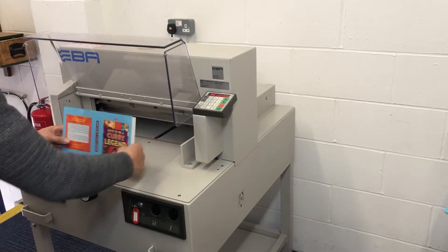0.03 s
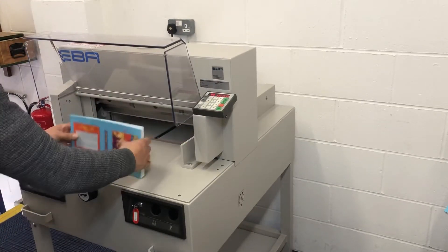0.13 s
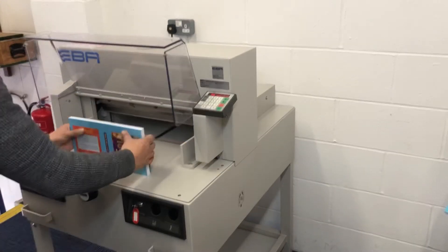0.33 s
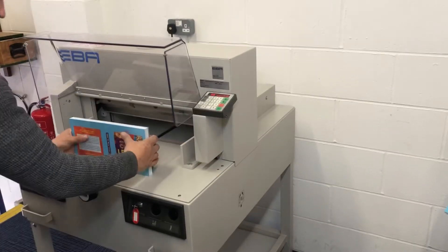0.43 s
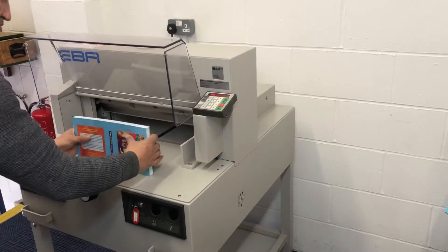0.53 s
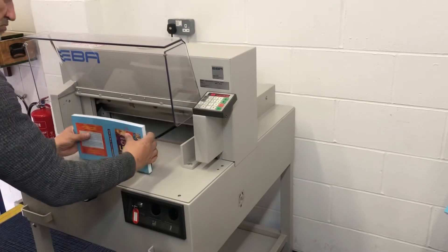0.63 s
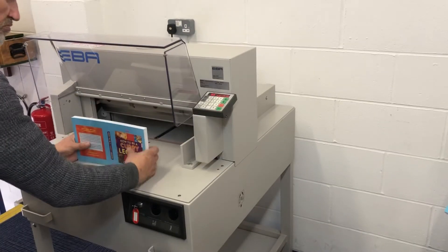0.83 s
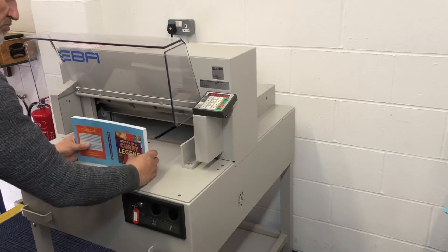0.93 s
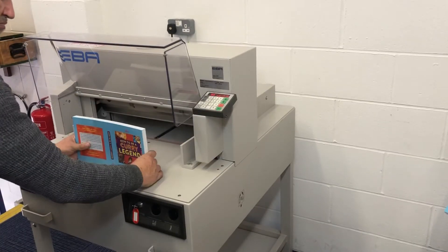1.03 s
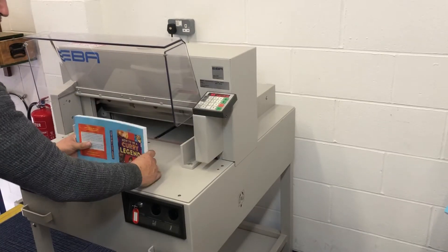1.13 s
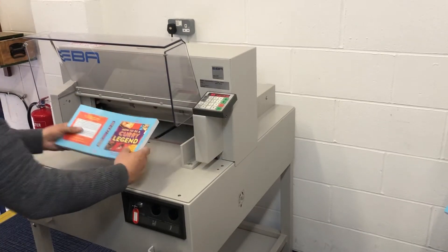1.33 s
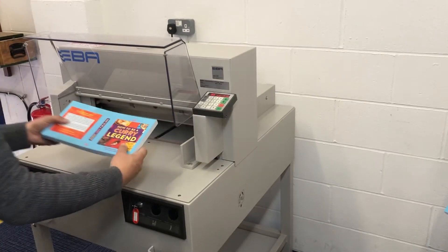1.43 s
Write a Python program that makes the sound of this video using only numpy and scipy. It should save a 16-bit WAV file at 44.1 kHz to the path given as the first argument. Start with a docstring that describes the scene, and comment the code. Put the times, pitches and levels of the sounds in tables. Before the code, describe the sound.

In a bare workroom with a faint hum, a paper stack thuds edge-down on a metal table two times. The panels resonate and the walls echo, while fingers and sheets rustle quietly before, between and after the knocks.

```python
"""A stack of paper knocked twice on the steel table of a cutting machine in a bare workroom.
Each time a corner touches first, then the whole edge slaps down; the table rings, the walls echo.
The machine's panels boom under the weight; one springs back as the stack is lifted.
Fingers and sheets rustle around the knocks, over room air and a faint hum."""
import sys
import numpy as np
from scipy import signal
from scipy.fft import rfft, irfft
from scipy.io import wavfile

SR = 44100
rng = np.random.default_rng(int(sys.argv[2]) if len(sys.argv) > 2 else 0)


def transcribe(u):
    """Save the signal u as a 16-bit wav file named by the first command-line argument.

    u: samples, shape (n,) or (channels, n), limited to [-1, 1]; the rate is SR.
    q: integer samples, one column per channel.
    """
    v = np.clip(np.atleast_2d(u).T, -1, 1)
    q = np.round(v * 32767).astype(np.int16)
    wavfile.write(sys.argv[1], SR, q)


N = 66150

# still room air (frequency [Hz], relative density [dB])
AIR_SPECTRUM = [(20, -6), (45, 1.5), (72, 9.5), (110, 3), (200, 0), (330, -5.5), (500, -7), (800, -13),
                (1500, -18.5), (3000, -24.5), (7000, -36), (15500, -39)]
# machine hum (frequency [Hz], level [dB])
HUM_TONES = [(150, -54), (226, -67), (441, -69)]
# room decay (frequency [Hz], T60 [s])
ROOM_DECAY = [(100, 0.8922), (300, 0.8009), (900, 0.901), (2200, 0.7314), (4500, 0.7096), (8000, 0.2933),
              (15000, 0.0053)]
# echo against direct sound (frequency [Hz], gain [dB])
ROOM_GAIN = [(30, -18), (70, 1.5), (200, 2), (450, -1.5), (1100, -1.5), (2600, -5.5), (5500, -11),
             (10000, -4.5), (15000, -6.5)]
# bright swish of paper (frequency [Hz], relative density [dB])
SWISH_SPECTRUM = [(500, -17.5), (2000, -14), (5000, 0), (7500, -3), (10000, -1.5), (15500, -0.5)]
# lower scuff of paper (frequency [Hz], relative density [dB])
SCUFF_SPECTRUM = [(300, -9.5), (1000, -10), (2000, -14), (2450, 2.5), (2850, -4), (3300, -11), (4100, -9.5),
                  (4750, -2), (5500, -9), (7000, -10.5), (15000, -27)]
# sheets and fingers slide (peak time [s], rise [s], fall [s], level [dB], scuff re swish [dB])
RUSTLE_STROKES = [(.097, 0.0415, 0.0476, -62, -11.5), (.312, 0.01726, 0.01044, -65.5, -9),
                  (.375, 0.01486, 0.01902, -66, -7.5), (.45, 0.03205, 0.01891, -70.5, 2),
                  (.55, 0.03138, 0.01922, -66.5, 3), (.85, 0.0716, 0.02711, -64.5, -10),
                  (.955, 0.02617, 0.03268, -66, -23.5), (1.2, 0.03305, 0.06544, -73, -1.5),
                  (1.241, .012, .018, -66, 3), (1.409, 0.04315, 0.06016, -69.5, -12),
                  (1.492, 0.02554, .03, -64, 4.5)]
# machine panels (frequency [Hz], T60 [s], level in thump 1 [dB], level in thump 2 [dB])
PANEL_MODES = [(68.3, 0.44, -35.5, -54.5), (102.09, .4, -34, -29), (151.52, 0.437, -11.5, -30),
               (160.89, 1.2099, -28, -36), (173.72, 0.6975, -33, -21.5), (212.36, 0.38978, -24.5, -22),
               (293.4, 1.8997, -39.5, -50), (281.76, .4, -39.5, -26.5), (375.51, .5, -21.5, -36),
               (433.16, .45, -30, -29), (472.18, 0.47, -25.5, -30), (637.49, 0.9053, -31, -40),
               (678.86, 0.8284, -34.5, -47), (853.59, 0.47, -27, -39)]
# stack's weight lands on the machine (time [s], swell [s])
WEIGHT_THUMPS = [(.147, .02), (.757, 0.02121)]
# panel springs back (time [s], swell [s], frequency [Hz], T60 [s], level [dB])
PANEL_RELEASE = (1.015, .035, 169, .75, -30.5)
# steel table top (frequency [Hz], relative level [dB], T60 [s])
TABLE_MODES = [(187.99, -5, 0.18), (439.28, -1.5, 0.10688), (535.03, -8, .1), (955.3, -9, .07),
               (1092.1, -9, .11), (1328.8, -4.5, 0.12), (1497, -18, .15), (1850, -13.5, .15),
               (2157.6, -10.5, 0.12), (2276.3, -16.5, .15), (2490, -3.5, .09), (2799.8, -5.5, .09),
               (4366.2, -11, 0.033)]
# slap of the sheet edges (frequency [Hz], relative density [dB])
SLAP_SPECTRUM = [(30, -36), (65, -11), (130, -0.5), (280, -3), (450, -0.5), (680, -5), (880, -3.5),
                 (1400, -4.5), (2000, -3), (2700, -3.5), (3400, -9), (4200, -10.5), (5200, -15.5),
                 (6700, -18.5), (8200, -30.5), (10500, -30), (15500, -39.5)]
# stack meets table (time [s], gain [dB], bass shelf [dB], treble shelf [dB], landing decay [s])
STACK_CONTACTS = [(.108, -16.5, 0, -11, .007), (0.1214, -8.5, -2.5, 0.44, 0.0090715),
                  (.196, -23, 0, -5, .014), (0.7384, -22, -2.5, -13, .0035),
                  (.748, -10.6, -1.5, -10.2, .008)]


def amp(db):
    """Decibels to gain."""
    return 10 ** (np.asarray(db) / 20)


def unit(x):
    """Scale to rms 1."""
    return x / np.sqrt(np.mean(x ** 2) + 1e-20)


def decay(t, t60_s):
    """Envelope falling 60 dB in t60_s."""
    return np.exp(-np.log(1000) * t / t60_s)


def lookup(table, hz):
    """Interpolate on a log-frequency axis."""
    table_hz, values = np.transpose(table)
    return np.interp(np.log(hz + 1), np.log(table_hz + 1), values)


def add(mix, start_s, sound):
    """Mix a sound in at start_s."""
    part = mix[round(start_s * SR):][:len(sound)]
    part += sound[:len(part)]


def noise(spectrum):
    """Steady coloured noise, rms 1."""
    gain = amp(lookup(spectrum, np.fft.rfftfreq(N, 1 / SR)))
    return unit(irfft(rfft(rng.standard_normal(N)) * gain, N))


def sine(hz, t):
    """Sine at a random phase."""
    return np.sin(2 * np.pi * (hz * t + rng.random()))


def wander(step_s):
    """Random curve, one new point per step_s, rms 1."""
    steps = np.arange(N) / SR / step_s
    return unit(np.interp(steps, np.arange(N), rng.standard_normal(N)))


def minimum_phase(gain, size=4096):
    """Shortest causal impulse response with this spectrum."""
    mirrored = np.r_[gain, gain[-2:0:-1]]
    log_gain = np.log(np.maximum(mirrored, 1e-5))
    return np.fft.ifft(np.exp(np.conj(signal.hilbert(log_gain)))).real[:size]


def room_air(level_db=-54):
    """Still room: steady low noise."""
    return amp(level_db) * noise(AIR_SPECTRUM)


def machine_hum(waver=.3, waver_s=.036):
    """Faint tones, each wavering in level."""
    t = np.arange(N) / SR
    return sum(amp(db) * unit((1 + waver * wander(waver_s)) * sine(hz, t)) for hz, db in HUM_TONES)


def wall_echo(sound, delay_s=.0073, build_s=.016, size=512):
    """Dense reflections, treble dying first; new random paths per call."""
    hz, frame_s, bands = signal.stft(rng.standard_normal(N), SR, nperseg=size)
    t60_s = lookup(ROOM_DECAY, hz)[:, None]
    gain = amp(lookup(ROOM_GAIN, hz))[:, None]
    energy_norm = np.sqrt(2 * np.log(1000) / (t60_s * SR))
    bands = bands * gain * decay(frame_s, t60_s) * energy_norm
    tail = signal.istft(bands, SR, nperseg=size)[1][:N]
    build = np.clip((np.arange(N) / SR - delay_s) / build_s, 0, 1)
    return signal.fftconvolve(sound, tail * build)[:N]


def paper_rustle(grain_db=1, grain_s=.0025, echo_send_db=-1):
    """Sheets and fingers slide in short grainy swishes, with echo."""
    t, out = np.arange(N) / SR, np.zeros(N)
    swish, scuff = noise(SWISH_SPECTRUM), noise(SCUFF_SPECTRUM)
    grain = unit(amp(grain_db * wander(grain_s)))
    for peak_s, rise_s, fall_s, db, scuff_db in RUSTLE_STROKES:
        width_s = np.where(t < peak_s, rise_s, fall_s)
        stroke = np.exp(-.5 * ((t - peak_s) / width_s) ** 2)
        out += amp(db) * stroke * grain * (swish + amp(scuff_db) * scuff)
    return out + amp(echo_send_db) * wall_echo(out)


def panel_mode(swell_s, hz, t60_s, db):
    """One mode swells and dies away."""
    t = np.arange(N) / SR
    swell = np.sin(np.pi / 2 * np.minimum(t / swell_s, 1)) ** 2
    return amp(db) * swell * decay(t, t60_s) * np.sin(2 * np.pi * hz * t)


def panel_booms():
    """Large panels boom under each thump, and softly as the weight comes off."""
    out = np.zeros(N)
    for k, (start_s, swell_s) in enumerate(WEIGHT_THUMPS):
        for hz, t60_s, *thump_db in PANEL_MODES:
            add(out, start_s, panel_mode(swell_s, hz, t60_s, thump_db[k]))
    lift_s, *mode = PANEL_RELEASE
    add(out, lift_s, panel_mode(*mode))
    return out


def table_ring(t, gain_db=-5.5):
    """Struck steel top: a sum of decaying modes."""
    return sum(amp(gain_db + db) * decay(t, t60_s) * sine(hz, t) for hz, db, t60_s in TABLE_MODES)


def edge_contact(gain_db, bass_db, treble_db, land_s, rise_s=.0024242, bass_hz=547.32, treble_hz=2700):
    """Hundreds of sheet edges land in a flurry and ring the table; returns (slap, ring)."""
    t, hz = np.arange(SR // 4) / SR, np.fft.rfftfreq(8192, 1 / SR)
    rise = np.minimum(t / rise_s, 1)
    flurry = rng.choice([-1., 1.], len(t)) * rise * np.exp(-t / (2 * land_s))
    slap_filter = minimum_phase(unit(amp(lookup(SLAP_SPECTRUM, hz))))
    slap = signal.fftconvolve(flurry, slap_filter)[:len(t)]
    ring = rise * table_ring(t)
    low_shelf_db = bass_db / (1 + (hz / bass_hz) ** 2)
    high_shelf_db = treble_db * hz ** 2 / (hz ** 2 + treble_hz ** 2)
    touch = minimum_phase(amp(gain_db + low_shelf_db + high_shelf_db))
    return signal.fftconvolve(slap, touch), signal.fftconvolve(ring, touch)


def stack_knocks(spots=4, spot_s=.005, ring_send_db=-6):
    """Contacts and echoes; each spot along the edge reaches the walls by different paths."""
    out, send = np.zeros(N), np.zeros(N)
    for start_s, *blow in STACK_CONTACTS:
        slap, ring = edge_contact(*blow)
        add(out, start_s, slap + ring)
        add(send, start_s, slap + amp(ring_send_db) * ring)
    position = np.arange(N) / SR / spot_s  # contact point cycles through the spots
    for k in range(spots):
        distance = abs((position - k + 1) % spots - 1)
        crossfade = np.cos(np.pi / 2 * np.minimum(distance, 1))
        out += wall_echo(crossfade * send)
    return out


def scene():
    """All sources at one microphone."""
    return (stack_knocks() + panel_booms() + paper_rustle() + machine_hum() + room_air())[None]


def record(dry, low_cut_hz=48, band_limit_hz=15900):
    """Microphone low cut, then band limit."""
    highpass = signal.butter(2, low_cut_hz, "highpass", fs=SR, output="sos")
    lowpass = signal.firwin(511, band_limit_hz, window=("kaiser", 9), fs=SR)
    return signal.oaconvolve(signal.sosfilt(highpass, dry), lowpass[None], "same")


dry = scene()
out = record(dry)
transcribe(out)
```